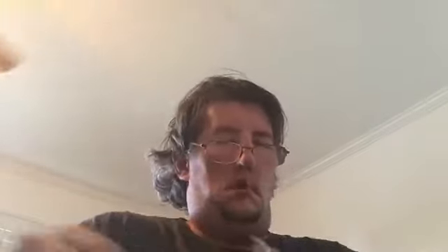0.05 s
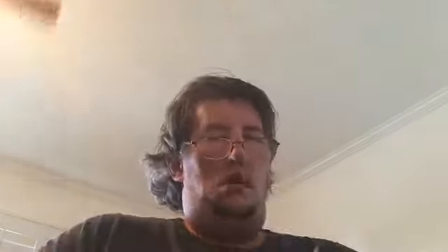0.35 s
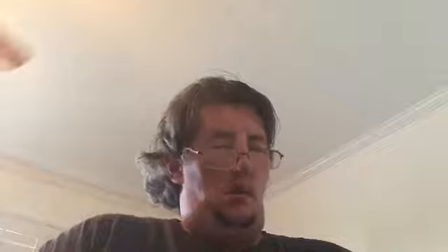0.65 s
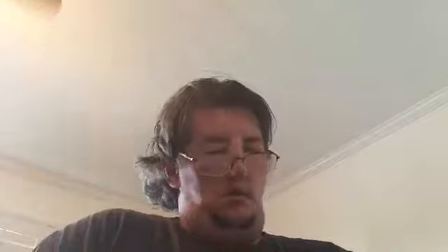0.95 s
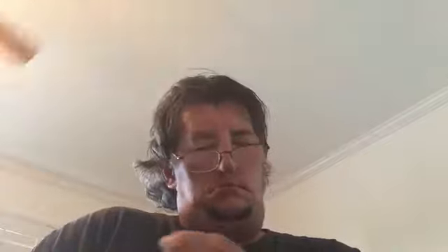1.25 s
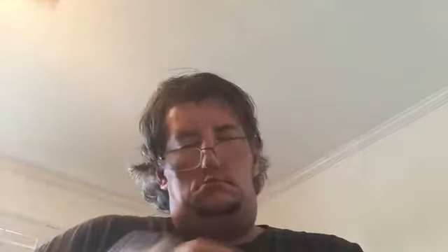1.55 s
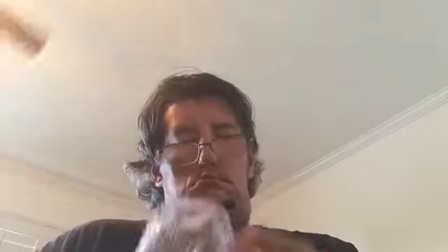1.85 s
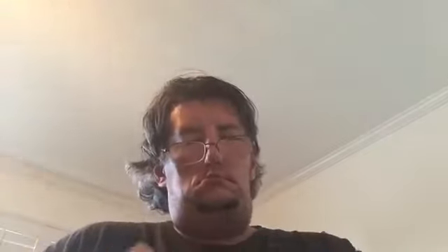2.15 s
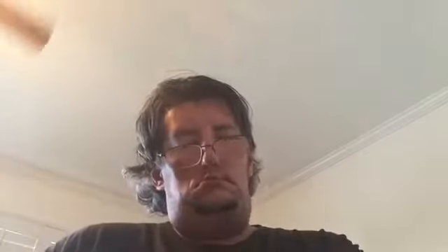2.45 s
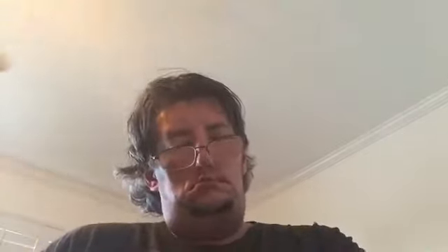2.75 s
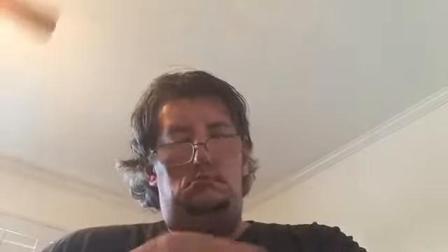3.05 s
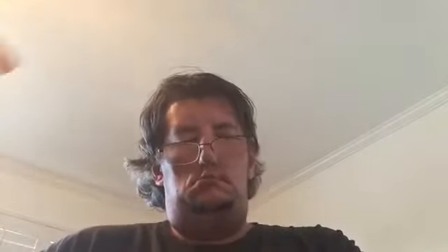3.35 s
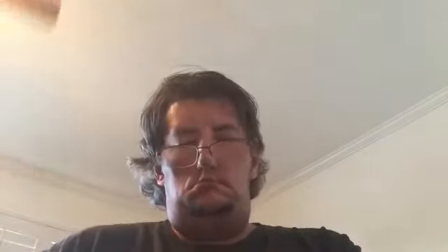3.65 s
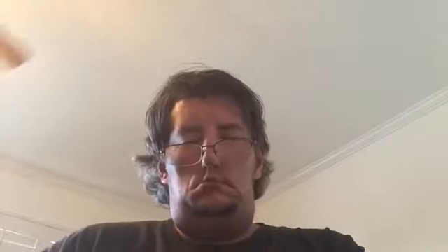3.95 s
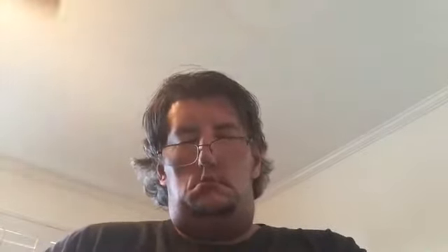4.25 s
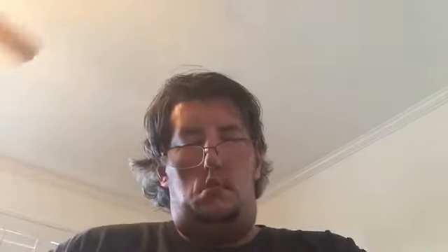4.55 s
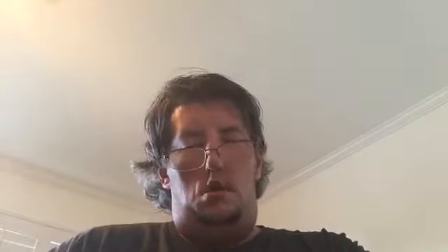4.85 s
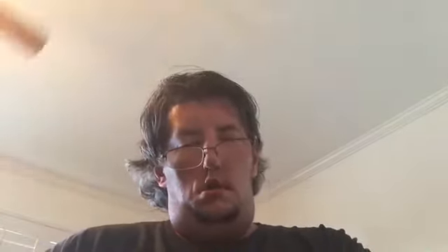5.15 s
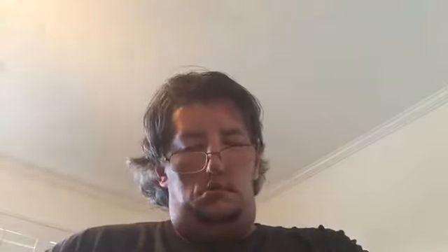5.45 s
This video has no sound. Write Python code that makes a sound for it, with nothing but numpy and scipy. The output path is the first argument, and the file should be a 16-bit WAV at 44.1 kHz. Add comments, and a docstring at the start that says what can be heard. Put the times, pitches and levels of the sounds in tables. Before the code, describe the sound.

Bubble wrap rustles and crinkles in someone's hands, with a dull thump on a desk near the start.

```python
"""Bubble wrap rustles, and a moment later something thumps on the desk under it and sets off a rattle.
Hands keep crumpling the sheet: each squeeze buckles many tiny creases, stiff ones snap through,
fingers rub the taut film and now and then knock the hollow, air-filled bundle.
One small mono microphone stands on the desk, close to the hands; a fan hums faintly in the small room."""
import sys
import numpy as np
from scipy import signal
from scipy.fft import rfft, irfft, next_fast_len
from scipy.io import wavfile
from scipy.ndimage import map_coordinates

SR = 44100
rng = np.random.default_rng(int(sys.argv[2]) if len(sys.argv) > 2 else 0)


def log_audio(samples):
    """Write samples as a 16-bit WAV file to the path given in sys.argv[1]."""
    # one column per channel
    frames = np.atleast_2d(samples).T
    # limit to full scale, then quantise
    limited = np.clip(frames, -1, 1)
    pcm = np.round(limited * 32767).astype(np.int16)
    wavfile.write(sys.argv[1], SR, pcm)


N = 251399

# fan motor partials: f/Hz, rms level/dB
FAN_HUM = [(59.4, -60), (118.8, -59.5)]
# room tone spectrum: f/Hz, level/dB
AIR_SPECTRUM = [(20, -19), (32, -13), (48, -5), (62, -10), (90, -9.5), (130, -5.5), (170, -26), (230, -19),
                (320, -15), (450, -26), (1200, -22.5), (4000, -33.5), (15000, -32.5)]
# the background dips briefly after the thump: t/s, gain/dB
BACKGROUND_DIP = [(0.34, 0), (0.4, -8), (0.72, -10), (0.79, 0)]
# room decay: f/Hz, t60/s
ROOM_DECAY = [(150, 0.2), (1000, 0.22), (5000, 0.12), (14000, 0.3)]
# blows on the desk: t/s, level/dB
DESK_BLOWS = [(0.3281, -6.5), (0.452, -26)]
# desk modes: f/Hz, level/dB, t60/s, rise/s
DESK_MODES = [(85, -9, 0.12, 0.0049), (135, -5.5, 0.07, 0.0062), (170.4, 11.5, 0.029, 0.0034),
              (209, -19, 0.088, 0.0028), (273, -14.5, 0.16, 0.0053), (335.5, -26, 0.15, 0.0012),
              (600, -17.5, 0.058, 0.0032), (793, -38, 0.086, 0.0044), (1060, -23, 0.098, 0.0044),
              (1160, -26, .08, 0.0032), (1603, -20, 0.08, 0.0022)]
# loose things on the desk: f/Hz, level/dB
RATTLE_SPECTRUM = [(40, -14), (120, -15), (300, 4), (500, -15), (1100, -2), (2000, -5), (4000, -6),
                   (7000, -12.5), (14000, -26.5)]
# hands knocking the bundle: t/s, level/dB, contact cut-off/Hz, crunch re level/dB
HAND_KNOCKS = [(0.189, -22, 450, -10), (0.225, -30.5, 2200, 5), (0.449, -30.5, 1100, 10.5),
               (0.75, -37, 900, -14), (0.905, -38.5, 1200, -12), (2.2012, -23.5, 1010, -11),
               (2.562, -29.5, 454, -1.5), (2.7726, -26.5, 2600, 2.5), (2.8539, -28, 1800, 2.5),
               (2.862, -25, 328, -10), (3.275, -32, 885, -15), (4.199, -36, 1100, -12),
               (4.389, -28.5, 360, -17), (4.635, -31, 406, -11), (4.684, -29.5, 544, -9),
               (4.763, -35.5, 1900, 4), (4.860, -34, 300, -13)]
# modes of the hollow bundle: f/Hz, level/dB, t60/s
BUNDLE_MODES = [(218, -1.5, 0.052), (291, 0.5, 0.052), (349, -3.5, 0.085), (578, -4.5, 0.061),
                (694, 0.5, 0.046), (759, -2, 0.07), (1035, -3, 0.03), (1177, 6.5, 0.031),
                (1336, -3.5, 0.048), (1830, -23, 0.061)]
# a hand scuffing the bundle: f/Hz, level/dB
SCUFF_SPECTRUM = [(100, 1), (280, -5.5), (700, 0.5), (1500, 6.0), (4000, -15), (12000, -50)]
# fingers dragging over the bubbles: middle t/s, length/s, level/dB, resonance f/Hz
FINGER_RUBS = [(2.31, 0.051, -54, 3530), (3.325, 0.039, -49, 1180), (4.2, 0.02, -47.5, 1550)]
# creases snapping through: t/s, level/dB, f/Hz, ring/cycles
CREASE_SNAPS = [(0.228, -22, 4200, 1.6), (0.4503, -17, 8500, 2.3), (0.6924, -33, 5900, 3),
                (0.8662, -25, 5200, 1.1), (2.166, -23, 6600, 1.2), (2.4126, -20, 5800, 1.8),
                (2.4724, -21, 8300, 1.9), (2.4826, -21, 8500, 1.7), (2.7481, -19, 8700, 1.4),
                (2.7734, -15, 4700, 1.1), (2.7765, -16, 5300, 0.8), (2.7816, -17, 7900, 0.6),
                (2.855, -20, 4000, 1.8), (3.9356, -26, 4600, 1.5), (3.9552, -27, 5000, 1.2),
                (4.2664, -23, 6400, 2), (4.5536, -22.5, 9000, 1.8), (4.7662, -9, 5500, 1.1),
                (4.8429, -26, 5300, 1.8), (4.9504, -26, 8200, 4), (4.9831, -24, 9300, 3),
                (5.0193, -18, 4000, 1.7), (5.02, -20, 9000, 2.5), (5.1197, -21, 6300, 1.2),
                (5.3, -18, 5500, 0.9), (5.3162, -15, 7700, 1.6), (5.3202, -15.5, 5800, 1),
                (5.3309, -17, 6300, 1.2), (5.4128, -21, 8400, 1.1), (5.5633, -25, 4000, 1.6),
                (5.5819, -12, 10000, 1.3)]
# crinkling film: f/Hz, level/dB
FILM_SPECTRUM = [(1060, -24), (1800, -6.5), (1950, -8), (2110, -11.5), (2670, -5), (3030, -4.5),
                 (3310, -3.5), (5320, -1), (7610, -4), (8400, -2.5), (11900, -1.5), (14600, -4.5),
                 (15300, -6)]
# the whole sheet flexing: f/Hz, level/dB
SHEET_SPECTRUM = [(100, -48.5), (170, -5.5), (215, -3.5), (253, -2), (352, 3.5), (432, -13.5), (595, -3.5),
                  (787, -2), (924, -8), (1020, -1.5), (1210, 1), (1370, -3.5), (1630, 1.5), (2200, -9.5),
                  (2860, -45), (4840, -120)]
# squeezes: tightest t/s, rustle/dB, tightening/s, relaxing/s, flexing re rustle/dB, treble tilt/dB
HAND_SQUEEZES = [(-0.024, -39.5, 0.219, 0.17, -9.5, -3.5), (0.2, -33.0, 0.03, 0.091, -11.5, -2),
                 (0.301, -40.0, 0.017, 0.189, -5.5, -4), (0.458, -35.0, 0.023, 0.052, -11.5, 1.0),
                 (0.603, -45.5, 0.034, 0.042, -3.5, -4), (0.698, -45.0, 0.015, 0.197, -9.5, -2),
                 (0.86, -40.0, 0.106, 0.174, -11.5, -2.5), (1.005, -43.0, 0.012, 0.156, -10, 6),
                 (1.151, -37.5, 0.096, 0.162, -16, -0.5), (1.453, -39.5, 0.083, 0.137, -12.5, -2.5),
                 (1.625, -41.0, 0.175, 0.08, -20, 2), (1.884, -40.0, 0.096, 0.078, -18, -1.5),
                 (2.052, -42.5, 0.046, 0.162, -15, -5), (2.187, -40.5, 0.13, 0.067, -16, 0),
                 (2.415, -36.0, 0.084, 0.07, -11, 4), (2.56, -37.0, 0.155, 0.117, -18, -0.5),
                 (2.784, -31.5, 0.041, 0.077, -18.5, -1.5), (2.835, -42.5, 0.026, 0.146, -23, -3),
                 (3.213, -47.0, 0.033, 0.142, -8.5, 0), (3.385, -41.5, 0.138, 0.035, -17, 0.5),
                 (3.517, -40.0, 0.112, 0.116, -21, 2), (3.775, -41.0, 0.143, 0.136, -17, 2),
                 (4.026, -42.0, 0.102, 0.119, -14, -1.5), (4.199, -38.5, 0.043, 0.145, -17, 1.5),
                 (4.394, -39.5, 0.033, 0.069, -18, 5), (4.51, -42.5, 0.105, 0.061, -17, 1.5),
                 (4.772, -40.0, 0.158, 0.097, -14, 0.5), (5.118, -36.5, 0.124, 0.032, -15.5, 4),
                 (5.238, -38.0, 0.069, 0.012, -15.5, 0.0), (5.344, -36.0, 0.084, 0.106, -17.5, 2),
                 (5.582, -39.0, 0.078, 0.035, -17, -3), (5.678, -44.0, 0.132, 0.041, -25, -0.5)]

SQUEEZE_SHAPE = 1.4  # exponent of swell and fade: 1 is pointed, 2 is a round bell
HOLD_DB, HOLD_FLEX_DB = -54, -23  # the wrap merely held: its rustle, and its flexing relative to that
BUCKLES_PER_S, BUCKLES_GROWTH = 2200, 0.7  # at average effort; dB of rate per dB of rustle
SNAP_LOW_HZ = 1100  # the snaps carry little sound below this
TILT_PIVOT_HZ, LOW_CUT_HZ, BAND_LIMIT_HZ = 8000, 44, 15400


def amp(db):
    """Decibels to gain."""
    return 10 ** (np.asarray(db) / 20)


def unit(x):
    """Scale to rms 1."""
    return x / np.sqrt(np.mean(x ** 2) + 1e-20)


def along(points, hz):
    """Read (f/Hz, value) points on a log frequency axis."""
    f, values = np.transpose(points)
    return np.interp(np.log(hz + 1), np.log(f + 1), values)


def wobble(rate):
    """A smooth random curve with rate knots a second."""
    return map_coordinates(rng.standard_normal(int(N * rate / SR) + 4), [np.arange(N) * rate / SR])


def filtered(x, response):
    """Multiply the spectrum of x by a function of frequency."""
    size = next_fast_len(len(x) + SR // 4)
    return irfft(rfft(x, size) * response(np.fft.rfftfreq(size, 1 / SR)), size)[:len(x)]


def coloured(x, spectrum, size=4096):
    """Minimum-phase filter with the given (f/Hz, level/dB) shape."""
    cepstrum = irfft(np.log(amp(along(spectrum, np.fft.rfftfreq(size, 1 / SR))) + 1e-6))
    cepstrum[1:size // 2] *= 2
    cepstrum[size // 2 + 1:] = 0
    return signal.fftconvolve(x, irfft(np.exp(rfft(cepstrum))))[:len(x)]


def noise(spectrum, length):
    """Coloured noise of rms 1."""
    return unit(coloured(rng.standard_normal(length), spectrum))


def add(track, s, sound):
    """Mix a sound into the track at time s."""
    part = track[max(round(s * SR), 0):][:len(sound)]
    part += sound[:len(part)]


def fan():
    """Slightly unsteady motor hum over the soft rush of room air; both dip briefly."""
    t = np.arange(N) / SR
    hum = np.zeros(N)
    for hz, db in FAN_HUM:
        peak = np.sqrt(2) * amp(db + 0.67 * wobble(5.8))
        hum += peak * np.sin(2 * np.pi * hz * t + 0.22 * wobble(4.33))
    air = amp(-59.5) * noise(AIR_SPECTRUM, N)
    dip_db = np.interp(t, *np.transpose(BACKGROUND_DIP))
    return amp(dip_db) * (hum + air)


def room(x):
    """The walls answer 5 ms after the direct sound with a short tail, dying fastest near 5 kHz."""
    hz, t, spectra = signal.stft(rng.standard_normal(SR // 2), SR, nperseg=256)
    decay = amp(-60 * t / along(ROOM_DECAY, hz)[:, None])
    tail = signal.istft(spectra * decay, SR, nperseg=256)[1]
    tail = np.pad(tail, (SR // 200, 0))
    return signal.fftconvolve(x, tail / np.linalg.norm(tail))[:N]


def desk_thumps():
    """A soft heavy blow swells into the low modes of the desk, and loose things on it rattle."""
    track, t = np.zeros(N), np.arange(SR // 2) / SR
    first_touch = 0.55 * amp(-60 * t / 0.115)
    landing = 0.58 * np.exp(-((t - 0.0095) / 0.0038) ** 2)  # the full weight arrives a moment later
    ring = sum(amp(level - 60 * t / t60) * (1 - np.exp(-(t / rise) ** 2)) * np.sin(2 * np.pi * hz * t)
               for hz, level, t60, rise in DESK_MODES)
    for s, db in DESK_BLOWS:
        rattle = 0.16 * noise(RATTLE_SPECTRUM, len(t)) * (first_touch + landing)
        add(track, s, amp(db) * (ring / np.max(np.abs(ring)) + rattle))
    return track


def bundle_knocks():
    """The air-filled bundle rings hollow under a blow, duller for a soft finger; its film crunches."""
    track, t = np.zeros(N), np.arange(SR // 5) / SR
    for s, db, contact_hz, crunch_db in HAND_KNOCKS:
        ring = np.zeros(len(t))
        for hz, level, t60 in BUNDLE_MODES:
            decay = amp(level + rng.normal(0, 1.0) - 60 * t / t60)
            bloom = 1 - np.exp(-hz * t / 0.89)  # about a cycle to build up: low modes come last
            ring += decay * bloom * np.sin(2 * np.pi * (hz * t + rng.random()))
        scuff = noise(SCUFF_SPECTRUM, len(t)) * amp(-60 * t / 0.043) * (1 - np.exp(-t / 0.001))
        body = signal.lfilter(*signal.butter(3, contact_hz, fs=SR), ring + 3.06 * scuff)
        crunch = noise(FILM_SPECTRUM, len(t)) * amp(-60 * t / 0.034) * (1 - np.exp(-t / 0.0006))
        add(track, s, amp(db) * (0.28 * body + amp(crunch_db) * crunch))
    return track


def finger_rubs():
    """A dragging finger excites one narrow resonance of the taut film."""
    track, t = np.zeros(N), np.arange(N) / SR
    for s, length, db, centre_hz in FINGER_RUBS:
        band = unit(filtered(rng.standard_normal(N), lambda hz: 1 / (1 + ((hz - centre_hz) / 260) ** 4)))
        track += amp(db) * np.exp(-(2 * (t - s) / length) ** 2) * band
    return track


def crease_snaps():
    """A stiff crease flips: a few sharp cycles at most, then a short shiver of the film around it."""
    track, t = np.zeros(N), np.arange(SR // 40) / SR
    fade = 0.24 * amp(-60 * t / 0.005) + 0.07 * amp(-60 * t / 0.02)
    for s, db, hz, cycles in CREASE_SNAPS:
        age = hz * t / cycles
        flip = np.sin(2 * np.pi * hz * t) * age * np.exp(-2.3 * age)
        shiver = noise(FILM_SPECTRUM, len(t)) * fade
        add(track, s, amp(db) * (flip / np.max(np.abs(flip)) + shiver))
    return signal.lfilter(*signal.butter(1, SNAP_LOW_HZ, "high", fs=SR), track)


def hand_effort():
    """Squeezes swell, relax and add in power; gives rustle, flexing and treble tilt in dB."""
    t = np.arange(N) / SR
    film_power = np.full(N, amp(HOLD_DB) ** 2)
    sheet_power = np.full(N, amp(HOLD_DB + HOLD_FLEX_DB) ** 2)
    weighted_tilt = np.zeros(N)
    for s, db, tighten_s, relax_s, flex_db, tilt_db in HAND_SQUEEZES:
        away = np.abs(t - s) / np.where(t < s, tighten_s, relax_s)
        power = (amp(db) * np.exp(-np.minimum(away, 10) ** SQUEEZE_SHAPE)) ** 2
        film_power += power
        sheet_power += power * amp(flex_db) ** 2
        weighted_tilt += power * tilt_db
    return 10 * np.log10(film_power), 10 * np.log10(sheet_power), weighted_tilt / film_power


def crackle(per_s, spread_db, centre_hz, octaves, cycles, size=96):
    """Tiny buckles of the film, each a damped ring of its own pitch and strength."""
    starts = np.flatnonzero(rng.random(N) < per_s / SR)
    pitch, strength, phase = rng.standard_normal((len(starts), 3)).T[:, :, None]
    hz = np.clip(centre_hz * 2 ** (octaves * pitch), 100, SR / 2)
    turns = hz * np.arange(size) / SR
    gain = amp(spread_db * np.minimum(strength, 2)) * np.sqrt(hz)
    rings = gain * np.exp(-turns / cycles) * np.sin(2 * np.pi * (turns + phase))
    samples = starts[:, None] + np.arange(size)
    track = np.bincount(samples.ravel(), rings.ravel(), N + size)[:N]
    return unit(track / np.sqrt(per_s))  # the rate sets density, not loudness


def patchy(x, depth_db, size=256):
    """The colour drifts in patches as the sheet changes shape."""
    spectra = signal.stft(x, nperseg=size)[2]
    patch = np.outer(np.hanning(9), np.hanning(35))  # bins by frames
    drift = signal.fftconvolve(rng.standard_normal(spectra.shape), patch, "same")
    return signal.istft(spectra * amp(depth_db * unit(drift)), nperseg=size)[1][:len(x)]


def wrap_rustle():
    """Harder handling buckles more creases at once; the film slides on itself and the sheet flexes."""
    rustle_db, flex_db, tilt_db = hand_effort()
    per_s = BUCKLES_PER_S * amp(BUCKLES_GROWTH * (rustle_db - np.mean(rustle_db)))
    catches_db = 1.26 * wobble(50) + wobble(300)  # bubbles catch and let go in clumps
    buckles = crackle(per_s, spread_db=-1.0, centre_hz=7700, octaves=0.74, cycles=0.67)
    ticks = crackle(0.03 * per_s, spread_db=1.5, centre_hz=7500, octaves=0.44, cycles=1.0)  # larger folds
    crinkle = 0.68 * buckles + 0.21 * ticks + 0.7 * rng.standard_normal(N)
    film = unit(patchy(coloured(crinkle, FILM_SPECTRUM), depth_db=1.08))
    treble = filtered(film, lambda hz: hz ** 4 / (hz ** 4 + TILT_PIVOT_HZ ** 4))
    film = treble * amp(tilt_db / 2) + (film - treble) * amp(-tilt_db / 2)
    folds = crackle(0.3 * per_s, spread_db=3, centre_hz=1056, octaves=1.13, cycles=0.6)
    flexing = 0.44 * folds + 0.93 * rng.standard_normal(N)
    sheet = unit(patchy(coloured(flexing, SHEET_SPECTRUM), depth_db=2.0))
    lurch_db = 2.3 * wobble(30)  # the sheet gives way in fits
    return amp(catches_db) * (amp(rustle_db) * film + amp(flex_db + lurch_db) * sheet)


def scene():
    """Wrap and desk close to the microphone, room and fan behind them; both channels alike."""
    near = wrap_rustle() + finger_rubs() + crease_snaps() + bundle_knocks() + desk_thumps()
    mono = near + amp(-10) * room(near) + fan()
    return np.array([mono, mono])


def record(dry):
    """The small microphone loses the deep bass; the recorder keeps nothing above its band limit."""
    thin = signal.lfilter(*signal.butter(2, LOW_CUT_HZ, "high", fs=SR), dry)
    return np.array([filtered(channel, lambda hz: hz < BAND_LIMIT_HZ) for channel in thin])


dry = scene()
out = record(dry)
log_audio(out)
```